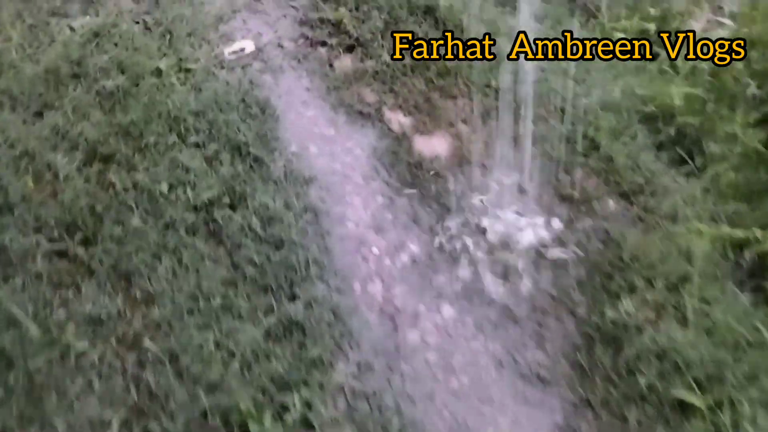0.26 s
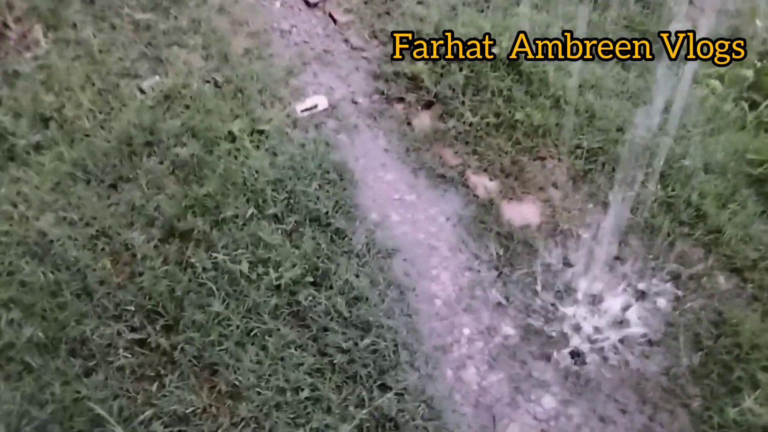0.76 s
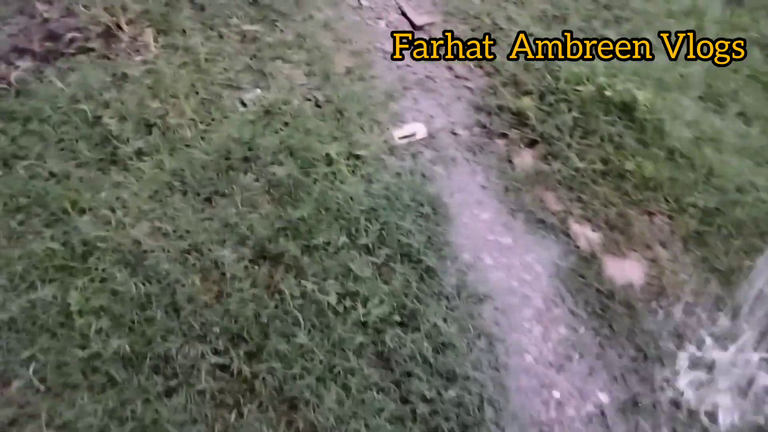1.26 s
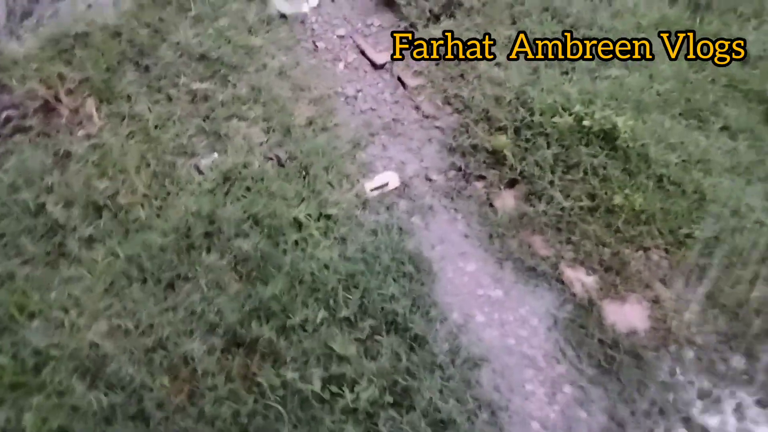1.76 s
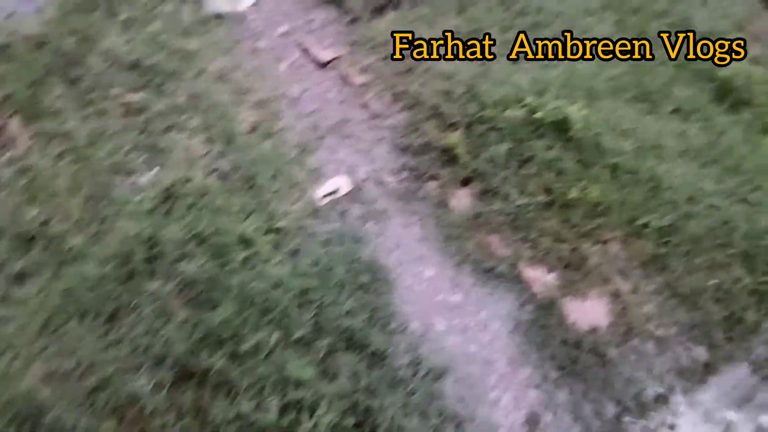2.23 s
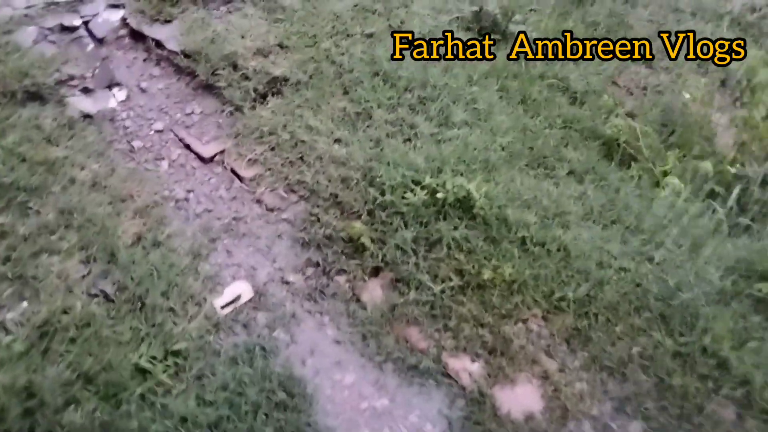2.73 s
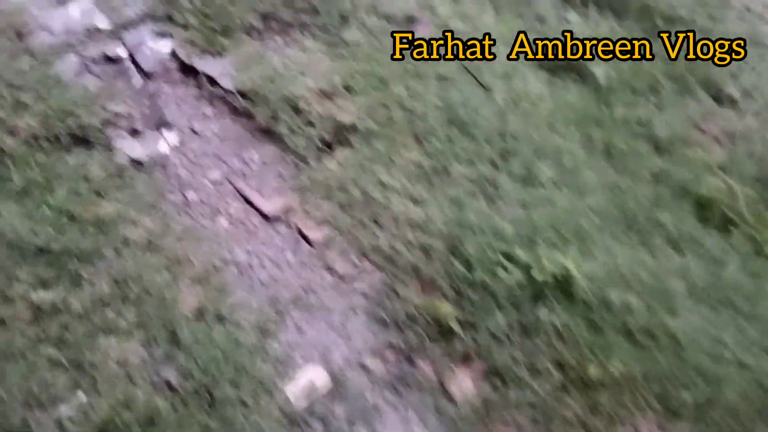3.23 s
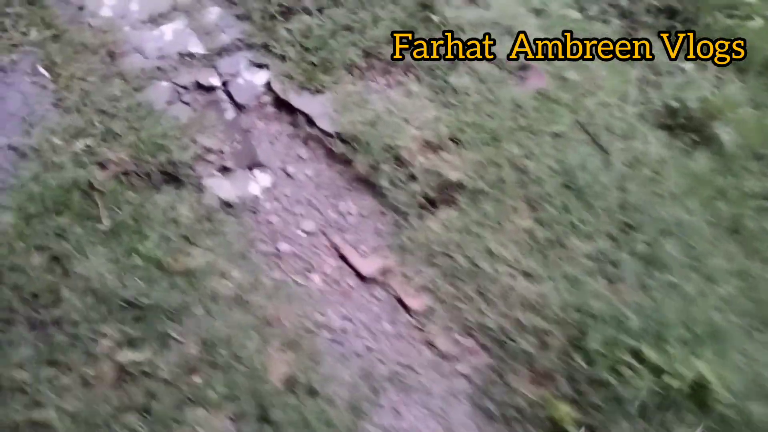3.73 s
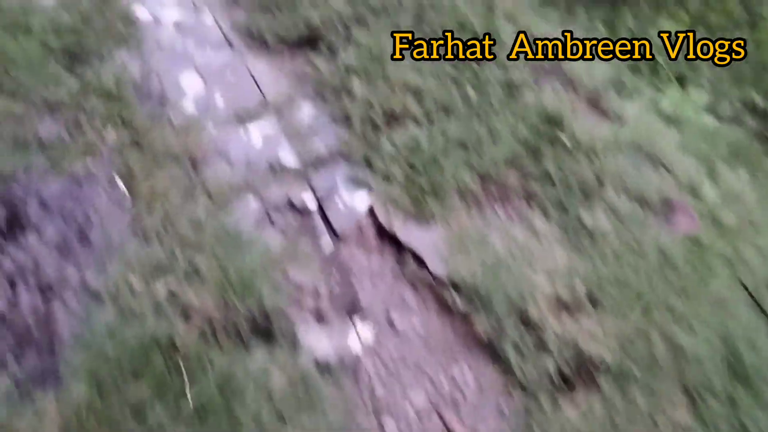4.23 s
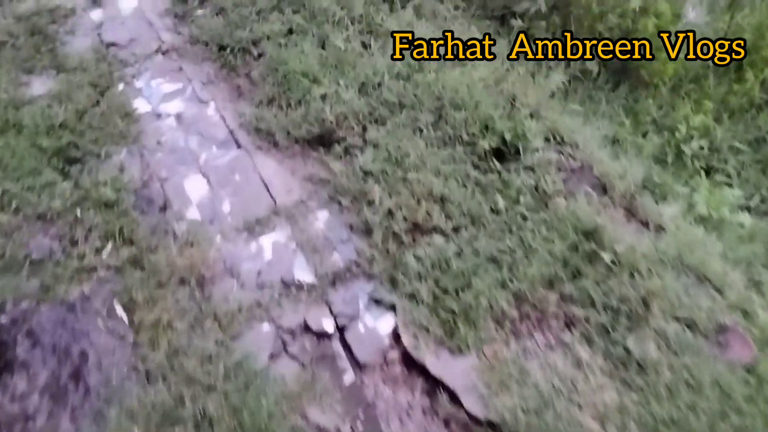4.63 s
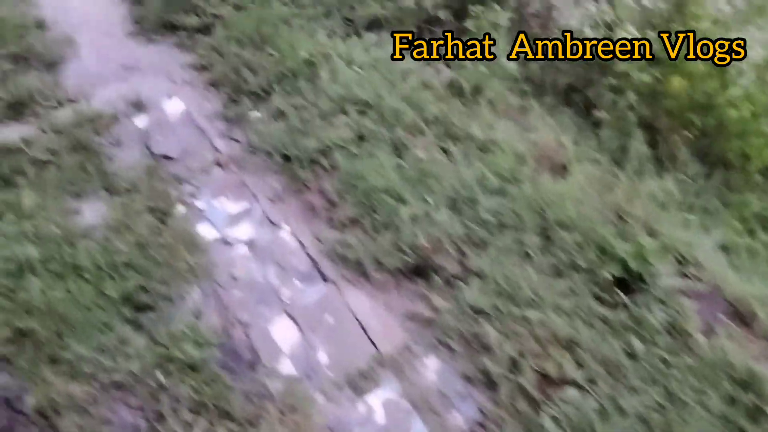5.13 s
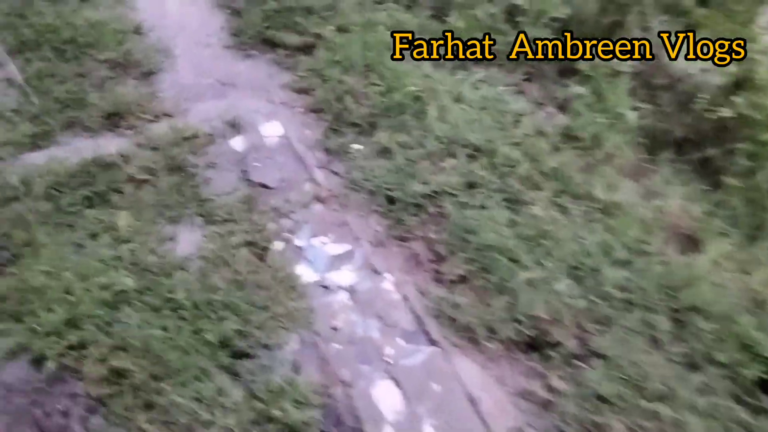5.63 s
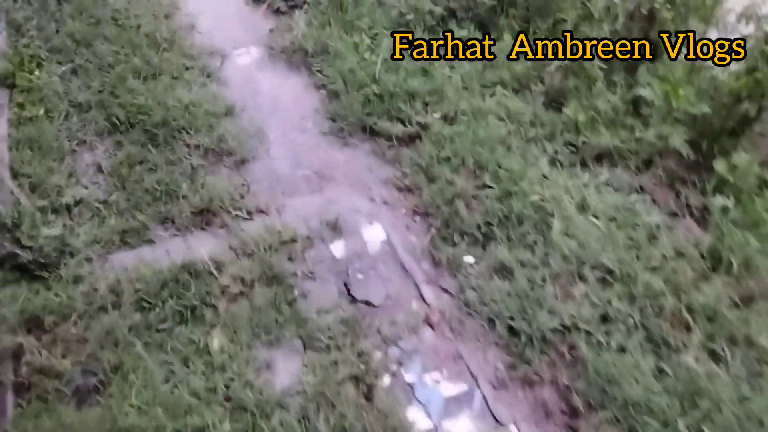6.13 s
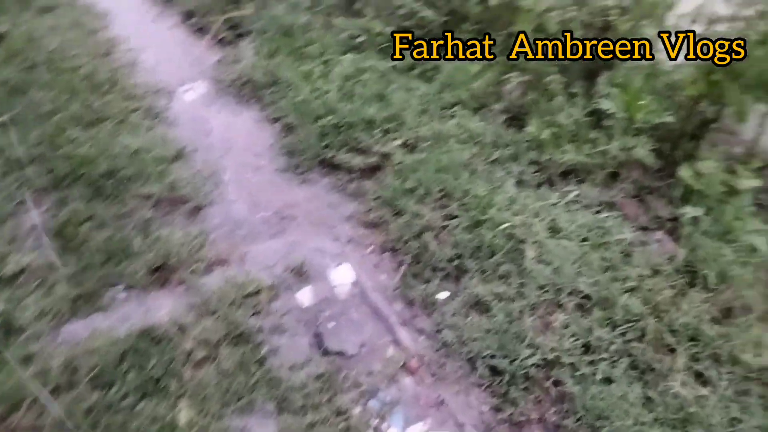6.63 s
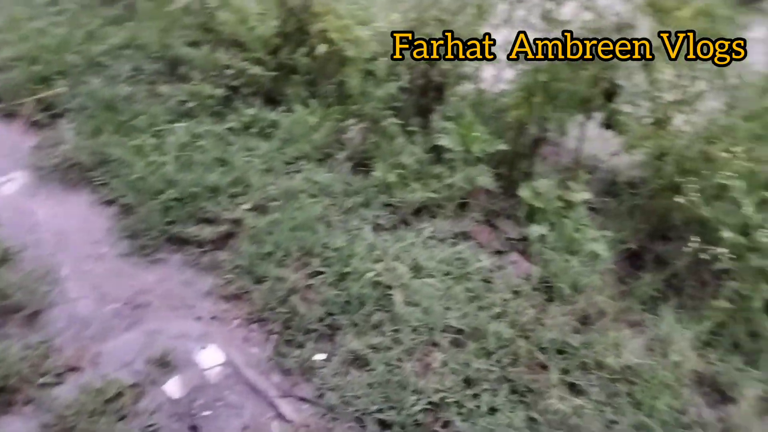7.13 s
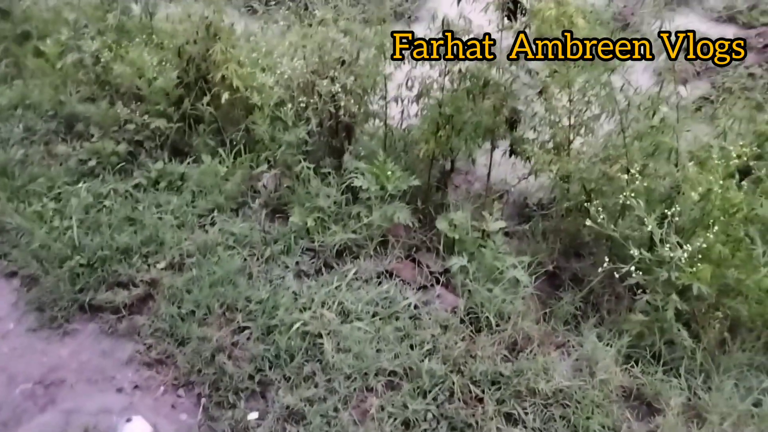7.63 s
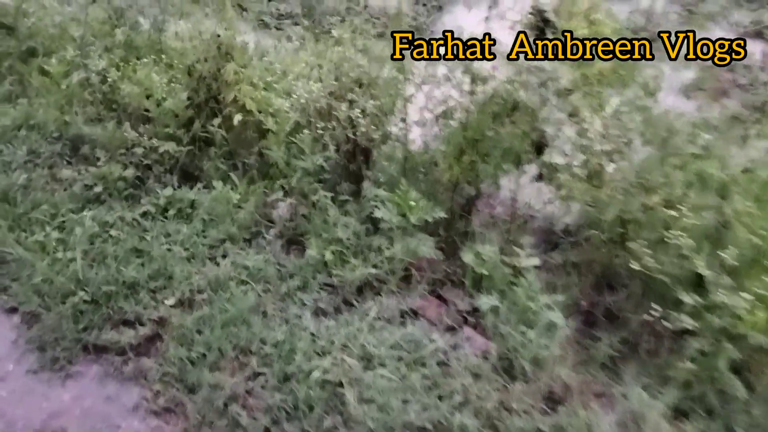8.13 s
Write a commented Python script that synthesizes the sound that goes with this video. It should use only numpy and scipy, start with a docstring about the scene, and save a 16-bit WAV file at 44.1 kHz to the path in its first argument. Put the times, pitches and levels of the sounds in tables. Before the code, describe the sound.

Heavy rain hisses on a lawn throughout, with near drops ticking and tiny bubbles ringing in puddles. From the start, a stream of roof water splats close by in quick, uneven slaps, with hollow plops during the first two seconds. At about 2 seconds the stream moves onto an umbrella just overhead, drumming on the taut wet cloth with dull thuds and a low boom. It is strongest from about 2.7 to 3.6 seconds, while the bright hiss turns muffled. Just before 4 seconds the water hits the ground again with crisp splatters, which slowly recede from about 6 seconds as the rain carries on. Deep wind rumbles on the carried phone microphone, strongest at the start and around 2.6 seconds, then easing. From about 6.5 seconds to the end, just past 8 seconds, very faint low tones waver far behind the rain.

```python
"""A stream off the roof splats into a puddle close by, breaking into slugs of water as it falls.
The microphone is a phone carried across a lawn in heavy rain; each port rings at its own treble pitch.
For two seconds the stream drums on the umbrella overhead, then hits the ground again and falls behind.
Drops tick and bubbles ring nearby, wind rumbles on the phone, and faint tones waver far off."""
import sys
import numpy as np
from scipy import signal
from scipy.fft import rfft, irfft, next_fast_len
from scipy.io import wavfile
from scipy.ndimage import map_coordinates

SR = 44100
rng = np.random.default_rng(int(sys.argv[2]) if len(sys.argv) > 2 else 0)


def persist_wave(psi):
    """Save psi, clipped to +-1, as 16-bit WAV."""
    counts = np.round(np.clip(psi, -1, 1) * 32767).astype(np.int16)
    wavfile.write(sys.argv[1], SR, np.atleast_2d(counts).T)


N = 369116

# The heaviest slugs bursting into spray, on the ground or on the umbrella while the stream crosses it.
# Each row: start in seconds, peak in dB, rise in seconds.
HEAVY_SPLATS = [(0.23, -16.5, 0.0062), (0.32, -18, 0.015), (0.6, -17, 0.019), (0.769, -13.5, 0.0068),
                (0.927, -16, 0.007), (0.976, -19, 0.0062), (1.008, -16.5, 0.014), (1.102, -16.5, 0.0059),
                (1.485, -15.5, 0.01), (1.547, -18.5, 0.014), (1.589, -15.5, 0.0045), (1.624, -15.5, 0.017),
                (1.752, -17.5, 0.017), (1.846, -18, 0.022), (1.945, -15.5, 0.0097), (2.175, -19, 0.013),
                (2.299, -20, 0.024), (2.422, -17.5, 0.015), (2.655, -16, 0.0034), (2.815, -19, 0.0066),
                (2.96, -17, 0.0095), (3.036, -22.5, 0.016), (3.34, -16.5, 0.0047), (3.978, -20.5, 0.022),
                (4.226, -16, 0.0094), (4.297, -18, 0.014), (4.6, -20, 0.0044), (4.76, -19.5, 0.011),
                (4.82, -19.5, 0.0045), (5.147, -19, 0.018), (5.376, -17.5, 0.014), (5.494, -17, 0.015),
                (5.594, -19, 0.014), (5.64, -18.5, 0.021), (5.781, -19, 0.016), (5.945, -19, 0.02),
                (6.455, -19.5, 0.016), (7.542, -21, 0.012), (7.814, -19.5, 0.0043)]
# The stream's way round the microphone. Each row: time in seconds, lag of the left port in ms,
# treble lost behind the cloth in dB, gain of the left port in dB.
STREAM_PATH = [(0, -0.096, 0, -0.5), (1.0, 0.0078, -1, -1), (2.3, 0.14, 1, 3), (2.75, 0.23, 8, 1),
               (3.1, 0.33, 10.5, -1), (3.65, .31, 8, -3), (3.95, 0.222, -1.5, -5), (4.7, -0.2, -1, -1),
               (8.37, -0.17, 1.5, -3)]
# Rain on the lawn. Each row: time in seconds, level in dB.
RAIN_LEVEL = [(0, -28.5), (.6, -32), (2.0, -29), (3.0, -26), (3.7, -28), (4.2, -29.5), (6.0, -28.5),
              (7.0, -27.5), (8.37, -26.5)]
# How alike the ports hear close sources and the open field. Each row: frequency in Hz, coherence 0-1.
NEAR_COHERENCE = [(200, 0.96), (600, 0.97), (1200, 0.74), (2000, 0.49), (3000, 0.43), (10000, 0)]
FIELD_COHERENCE = [(100, 0.97), (280, 0.89), (500, 0.48), (800, 0), (1500, 0.0074)]


def amp(db):
    """Decibels to gain."""
    return 10 ** (np.asarray(db) / 20)


def unit_rms(x):
    """Scales to rms 1."""
    return x / np.sqrt(np.mean(x ** 2) + 1e-20)


def at(curve, s, column=1):
    """One column of a curve at time s."""
    columns = np.transpose(curve)
    return np.interp(s, columns[0], columns[column])


def at_hz(spectrum, hz, column=1):
    """One column of a spectrum, joined on a log-frequency axis."""
    columns = np.transpose(spectrum)
    return np.interp(np.log(hz + 1), np.log(columns[0] + 1), columns[column])


def add(mix, s, sound):
    """Adds a sound to the mix at time s."""
    part = mix[:, max(round(s * SR), 0):][:, :sound.shape[1]]
    part += sound[:, :part.shape[1]]


def wander(per_s):
    """A random curve of about unit size that takes per_s new values a second."""
    place = np.arange(N) * per_s / SR
    knots = rng.standard_normal(int(place[-1]) + 2)
    return np.interp(place, np.arange(len(knots)), knots)


def impacts(rows):
    """Power over time of impacts: each starts abruptly, peaks after its rise time and falls away."""
    power = np.zeros((1, N))
    for s, db, rise_s in rows:
        age = np.arange(0, 5, 1 / (max(rise_s, 1 / 5000) * SR))  # in rise times
        add(power, s, (amp(db) ** 2 * age * np.exp((1 - age ** 2) / 2))[None])
    return power[0]


def shower(level, per_s, rise_s, spread_db, count):
    """Power of random impacts of uneven size whose mean level follows a curve."""
    gap, size, length = rng.random((count, 3)).T
    times = np.cumsum(-np.log(1 - gap)) / per_s
    power = impacts(zip(times, spread_db * size, rise_s * (.5 + length)))
    return power / power.mean() * amp(at(level, np.arange(N) / SR)) ** 2


def spray(grain_db):
    """Countless tiny bursts of uneven size; both ports get the same sizes but their own waveform."""
    return unit_rms(rng.standard_normal((2, N)) * amp(grain_db * wander(3000)))


def mottle(x, depth_db, width_hz, per_s):
    """No two drops ring alike: the colour drifts in random patches of time and frequency."""
    hz, t, spectra = signal.stft(x, SR, nperseg=256)
    grid = np.meshgrid(hz / width_hz, t * per_s, indexing="ij")
    patches = map_coordinates(rng.standard_normal((128, 2048)), grid, order=1, mode="wrap")
    return unit_rms(signal.istft(spectra * amp(depth_db * patches), SR, nperseg=256)[1][:, :N])


def at_mic(x, colour, coherence):
    """Colours a white pair by its source and by the ports, keeping its power; the bass is alike in both."""
    # The ports' resonances. Each row: frequency in Hz, left gain in dB, right gain in dB.
    ports = [(1020, 0.5, 1), (1960, 0, 4.5), (3030, 1, 4), (4000, 1, 6.5), (5090, 0, 12.5), (5400, 3, 14.5),
             (6290, 2, 8), (7430, 9.5, -0.5), (8100, 6.5, -5.5), (9160, -1, -6), (11000, -5, -9),
             (13200, -9, -4.5), (14400, -13, -9)]
    size = 2 * next_fast_len(N // 2 + 4096)
    hz = np.fft.rfftfreq(size, 1 / SR)
    left, right = rfft(x, size)
    shared = np.clip(at_hz(coherence, hz), 0, 1)
    left = shared * right + np.sqrt(1 - shared ** 2) * left
    ports_db = np.array([at_hz(ports, hz, column=1), at_hz(ports, hz, column=2)])
    gain = unit_rms(amp(at_hz(colour, hz) + ports_db))
    # minimum phase: every blow rings after it lands, never before
    cepstrum = irfft(np.log(gain).mean(0), size)
    phase = 2 * rfft(cepstrum[:size // 2], size).imag
    return irfft(gain * np.exp(1j * phase) * np.array([left, right]), size)[:, :N]


def placed(x):
    """Delays and weights the left port according to where the stream lands."""
    n = np.arange(N)
    lag = at(STREAM_PATH, n / SR) * SR / 1000
    left = map_coordinates(x[0], [n - lag], order=3)
    return np.array([left * amp(at(STREAM_PATH, n / SR, column=3)), x[1]])


def shaded(x, edge_hz=6500):
    """The umbrella takes away the top of the hiss while the stream runs over it."""
    dull = signal.sosfiltfilt(signal.butter(2, edge_hz, fs=SR, output="sos"), x)
    return dull + (x - dull) * amp(-at(STREAM_PATH, np.arange(N) / SR, column=2))


def far_tones(waver=.03, waver_per_s=14, fade_per_s=11):
    """Faint low tones waver, come and go far behind the rain."""
    # The tones. Each row: pitch in Hz, relative level in dB.
    pitches = [(335, 3.5), (400, -0.5), (545, 0), (625, -3)]
    # All of them together. Each row: time in seconds, level in dB.
    level = [(0, -69), (5.8, -60), (6.6, -49.5), (7.7, -51), (8.37, -43)]
    tones = np.zeros(N)
    for hz, db in pitches:
        fade = amp(db) * wander(fade_per_s)
        wavering_hz = hz * (1 + waver * wander(waver_per_s))
        tones += fade * np.sin(2 * np.pi * np.cumsum(wavering_hz) / SR)
    return unit_rms(tones) * amp(at(level, np.arange(N) / SR))


def rumble(wind_db=-1):
    """Deep wind buffets the microphone under the low roar of the downpour."""
    # Strength of the wind and of the roar. Each row: time in seconds, level in dB.
    wind_level = [(0, -25.5), (.3, -28), (.6, -31.5), (2.2, -32.5), (2.6, -27), (3.0, -30.5), (4.0, -34.5),
                  (8.37, -42.5)]
    roar_level = [(0, -29.5), (.3, -29), (.7, -32), (1.2, -33.5), (1.8, -38.5), (2.7, -30), (4.0, -38),
                  (5.8, -38.5), (7.0, -36), (8.37, -38.5)]
    # Their spectra. Each row: frequency in Hz, relative density in dB.
    wind_colour = [(10, -14), (22, -5.5), (38, -2), (65, -3), (100, -8), (160, -15), (400, -31),
                   (2000, -79)]
    roar_colour = [(40, -5), (110, -1.5), (160, 0.5), (210, 1), (270, -6), (350, -9.5), (500, -24),
                   (1000, -28.5), (4000, -66)]
    t = np.arange(N) / SR
    wind = at_mic(rng.standard_normal((2, N)), wind_colour, FIELD_COHERENCE)
    roar = at_mic(rng.standard_normal((2, N)), roar_colour, FIELD_COHERENCE)
    return wind * amp(wind_db + at(wind_level, t)) + roar * amp(at(roar_level, t))


def rain(wash_db=-1, ticks_db=-7):
    """Far drops merge into a wash; near ones tick on leaves and paving."""
    # The drops' spectrum. Each row: frequency in Hz, relative density in dB.
    colour = [(100, -13.5), (400, 0), (700, -1.5), (1200, -3.5), (2400, -0.5), (5000, -2.5), (8000, -2),
              (14000, -1)]
    wash = amp(wash_db + at(RAIN_LEVEL, np.arange(N) / SR) + 0.43 * wander(25))
    tick_power = shower(RAIN_LEVEL, per_s=260, rise_s=0.00075, spread_db=10, count=2800)
    envelope = np.hypot(wash, amp(ticks_db) * np.sqrt(tick_power))
    drops = mottle(spray(grain_db=1), depth_db=4.5, width_hz=404, per_s=78)
    return shaded(at_mic(envelope * drops, colour, FIELD_COHERENCE))


def bubbles(level_db=-14.5, middle_hz=2800, octaves=0.201, decay_cycles=18, glide=0.028, count=700):
    """Drops trap bubbles in the puddles; each rings briefly and rises in pitch as it nears the surface."""
    rings = np.zeros((2, N))
    t = np.arange(1500) / SR
    for (when, size, pan, phase_lead), pitch in zip(rng.random((count, 4)), rng.standard_normal(count)):
        hz = middle_hz * 2 ** (octaves * np.clip(pitch, -2, 2))
        age = hz * t / decay_cycles
        phase = 2 * np.pi * (hz * t * (1 + glide * age / 2) + np.array([[0], [phase_lead]]))
        gains = np.sqrt([[pan], [1 - pan]]) * amp(11 * size)
        add(rings, when * N / SR, gains * np.exp(-age) * np.sin(phase))
    return unit_rms(rings) * amp(level_db + at(RAIN_LEVEL, np.arange(N) / SR))


def yard_tail(x, t60_s=0.14, echoes_per_s=1500):
    """The house wall and the ground scatter a short tail."""
    t = np.arange(SR // 4) / SR
    taps = rng.standard_normal((2, len(t))) * (rng.random((2, len(t))) < echoes_per_s / SR)
    taps *= amp(-60 * t / t60_s) * (t > .002)
    taps /= np.linalg.norm(taps, axis=1, keepdims=True)
    return signal.oaconvolve(x, taps, axes=1)[:, :N]


def with_echoes(x, delay_s=.0016, drift=0.13, echo_db=-14):
    """Near surfaces send back early echoes; their paths drift on the walk and slowly shift the colour."""
    echoes = np.zeros((2, N))
    for port in range(2):
        for path_ratio in (.5, 1, 2):
            lag = path_ratio * delay_s * SR * np.exp(drift * wander(.5))
            echoes[port] += map_coordinates(x[port], [np.arange(N) - lag], order=2)
    return (x + amp(echo_db) * echoes) / np.sqrt(1 + 3 * amp(echo_db) ** 2)


def slugs(heavy, level, per_s, jitter, spread_db, rise_s):
    """The stream pinches off at a loosely even pace: impact rows for the slugs between the heavy ones."""
    marks = [0] + [row[0] for row in heavy] + [N / SR]
    beats = np.concatenate([np.linspace(a, b, max(round((b - a) * per_s), 1), endpoint=False)[1:]
                            for a, b in zip(marks, marks[1:])])
    late, size, length = rng.uniform(-1, 1, (256, 3))[:len(beats)].T
    times = beats + jitter * late / per_s
    return list(zip(times, at(level, times) + spread_db * size, rise_s * 2 ** (length / 2)))


def lulls(heavy, lull_s, lull_db):
    """Power gain over time: a heavy slug gathers the water ahead of it, so the stream thins briefly."""
    t = np.arange(N) / SR
    landings = np.array([row[0] for row in heavy] + [np.inf])
    wait = landings[np.searchsorted(landings, t)] - t
    return amp(lull_db * np.exp(-(wait / lull_s) ** 2)) ** 2


def umbrella(cloth_db=1, pushes_per_s=1400, fizz_db=-11, punch_db=20):
    """Slugs punch the taut wet cloth overhead, their lumps push and fizz on it, and the canopy booms."""
    # The heaviest slugs on the cloth. Each row: start in seconds, peak in dB, rise in seconds.
    thuds = [(2.068, -22, 0.005), (2.193, -22.5, 0.0051), (2.225, -20, 0.002), (2.381, -15.5, 0.003),
             (2.558, -18.5, 0.01), (2.596, -17, 0.0052), (2.727, -8, 0.002), (2.816, -18.5, 0.005),
             (2.96, -13.5, 0.011), (3.049, -16, 0.013), (3.37, -13, 0.004), (3.503, -14.5, 0.0054),
             (3.638, -15, 0.0077)]
    # Ordinary slugs, small drops and the boom of the canopy's middle.
    # Each row: time in seconds, level in dB.
    slug_level = [(1.9, -62), (2.1, -28), (2.3, -26.5), (2.5, -21), (3.15, -22.5), (3.45, -16), (3.62, -18),
                  (3.85, -28), (4.0, -47)]
    drop_level = [(2.0, -64), (2.45, -29), (2.65, -22.5), (2.79, -29.5), (2.9, -22.5), (3.12, -27.5),
                  (3.6, -20.5), (3.75, -38), (4.1, -61)]
    boom_level = [(2.3, -57), (2.45, -26), (2.66, -36), (2.8, -32), (2.88, -18), (2.95, -19.5), (3.02, -50),
                  (3.4, -63)]
    # Spectra of the cloth and the boom. Each row: frequency in Hz, relative density in dB.
    cloth_colour = [(30, -9), (90, -8), (180, -1.5), (380, -1.5), (600, -6.5), (1000, -6.5), (1500, -11),
                    (2500, -15.5), (5000, -24.5), (8000, -33.5), (14000, -33)]
    boom_colour = [(30, -15), (90, -1.5), (170, -3.5), (400, -2), (600, -15), (1500, -50)]
    falling = slugs(thuds, slug_level, per_s=19, jitter=0.36, spread_db=1, rise_s=0.011)
    patter = impacts(falling) + shower(drop_level, per_s=260, rise_s=0.0023, spread_db=2, count=1600)
    power = impacts(thuds) + lulls(thuds, lull_s=0.023, lull_db=-5) * patter
    pushes = unit_rms((rng.random(N) < pushes_per_s / SR) * rng.choice([-1, 1], (2, N)))
    blows = np.sqrt(power) * unit_rms(pushes + amp(fizz_db) * spray(grain_db=4.5))
    for s, db, _ in thuds + falling:
        add(blows, s, np.full((2, 1), amp(db + punch_db)))
    boom = at_mic(rng.standard_normal((2, N)), boom_colour, NEAR_COHERENCE)
    boom *= amp(at(boom_level, np.arange(N) / SR))
    return placed(amp(cloth_db) * at_mic(blows, cloth_colour, NEAR_COHERENCE) + boom)


def plops(falling, rise_s=0.0034, level_db=-1, glancing_db=-13, spread_db=4, glancing_until_s=2.0):
    """Heavy slugs slap into the hollow they have dug and make it ring; ordinary ones glance off it."""
    # Square hits in the hollow. Each row: start in seconds, peak in dB.
    hits = [(0.135, -25), (0.157, -26), (0.188, -22.5), (0.349, -24.5), (0.46, -27), (0.611, -27),
            (0.926, -28), (1.104, -26), (1.242, -21), (1.498, -25), (1.547, -22), (1.952, -25),
            (5.102, -22)]
    # The hollow's resonances. Each row: frequency in Hz, width in Hz, level in dB.
    modes = [(790, 160, -1), (970, 140, 0), (1505, 120, 3.5), (2770, 200, 0.5)]
    hz = np.geomspace(60, 14000, 400)
    ring = sum(amp(db) ** 2 / (1 + ((hz - mode_hz) / (width / 2)) ** 2) * np.minimum(hz / mode_hz, 1) ** 2
               for mode_hz, width, db in modes)
    colour = np.column_stack([hz, 10 * np.log10(ring)])
    aims = rng.uniform(-1, 1, 256)
    # the glancing ends when the umbrella turns the stream aside
    glancing = [(s, db + glancing_db + spread_db * aim)
                for (s, db, _), aim in zip(falling, aims) if s < glancing_until_s]
    slaps = np.sqrt(impacts((s, db, rise_s) for s, db in hits + glancing)) * spray(grain_db=3)
    return amp(level_db) * placed(at_mic(slaps, colour, NEAR_COHERENCE))


def deepened(x, depth_db=2, body_hz=1700, per_s=70):
    """Some splashes hit deep water and gain a hollow body, others only spray."""
    body = signal.sosfiltfilt(signal.butter(3, body_hz, fs=SR, output="sos"), x)
    return x - body + body * unit_rms(amp(depth_db * wander(per_s)))


def clumps(per_s=520, decay_s=0.0018, steady_power=0.69):
    """Gain over time: spray comes down in clumps that each land at once and die away."""
    landings = (rng.random(N) < per_s / SR) * (.5 + rng.random(N))
    power = signal.lfilter([1], [1, -np.exp(-1 / (decay_s * SR))], landings)
    return unit_rms(np.sqrt(steady_power + power / power.mean()))


def runoff(falling, crack_s=0.0017, small_crack_db=-2.5):
    """Close to the microphone, slugs land with a crack and burst into spray among smaller splashes."""
    # Small splashes round the stream. Each row: time in seconds, level in dB.
    scatter_level = [(0, -21.5), (.6, -25), (2.0, -29.5), (3.7, -29), (4.1, -25), (5.5, -28.5),
                     (6.3, -26.5), (8.37, -35)]
    # A splat's spectrum. Each row: frequency in Hz, relative density in dB.
    colour = [(100, -34), (300, -18), (600, -10.5), (1000, -7.5), (1500, -4.5), (3000, 2.5), (6000, 2.43),
              (9000, 0), (14000, -3)]
    heavy = impacts(HEAVY_SPLATS) + impacts((s, db, crack_s) for s, db, _ in HEAVY_SPLATS)
    ordinary = impacts(falling) + impacts((s, db + small_crack_db, crack_s) for s, db, _ in falling)
    scatter = shower(scatter_level, per_s=100, rise_s=0.0038, spread_db=3.5, count=1100)
    power = heavy + lulls(HEAVY_SPLATS, lull_s=.03, lull_db=-6) * (ordinary + scatter)
    envelope = np.sqrt(power) * clumps()
    burst = deepened(mottle(spray(grain_db=2.5), depth_db=3, width_hz=604, per_s=50))
    return shaded(placed(at_mic(envelope * burst, colour, NEAR_COHERENCE)))


def scene():
    """The stream close by, the umbrella overhead, rain and wind all round, the tones far off."""
    # Ordinary slugs bursting on the ground. Each row: time in seconds, peak in dB.
    slug_level = [(0, -24), (.5, -20.5), (2.0, -18.5), (2.55, -19), (2.75, -30.5), (3.4, -30), (3.72, -43),
                  (3.84, -20), (5.3, -20.5), (6.8, -27.5), (8.37, -25.5)]
    falling = slugs(HEAVY_SPLATS, slug_level, per_s=17, jitter=0.36, spread_db=2.5, rise_s=.015)
    stream = with_echoes(runoff(falling) + plops(falling))
    return stream + amp(-12) * yard_tail(stream) + umbrella() + rain() + bubbles() + rumble() + far_tones()


def record(dry, ceiling=0.8, edge_hz=14330):
    """The phone rounds off the tallest peaks and cuts off the highest treble."""
    low_pass = signal.firwin(511, edge_hz, window=("kaiser", 9), fs=SR)
    rounded = dry / (1 + (dry / ceiling) ** 4) ** .25
    return signal.oaconvolve(rounded, low_pass[None], "same")


dry = scene()
out = record(dry)
persist_wave(out)
```